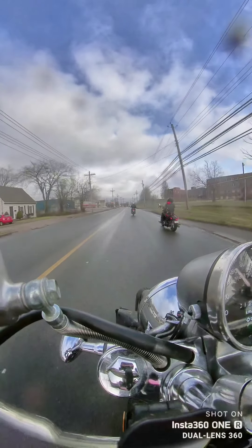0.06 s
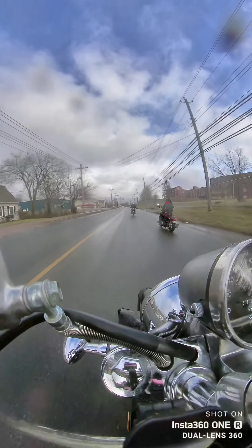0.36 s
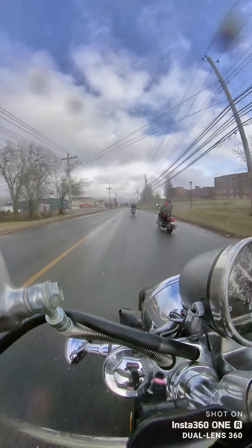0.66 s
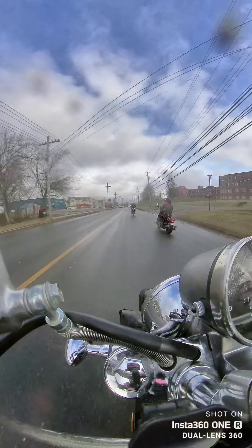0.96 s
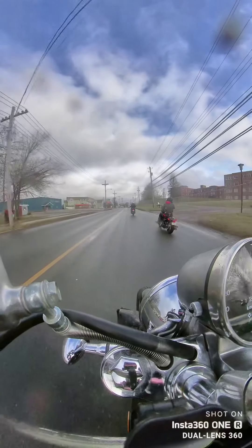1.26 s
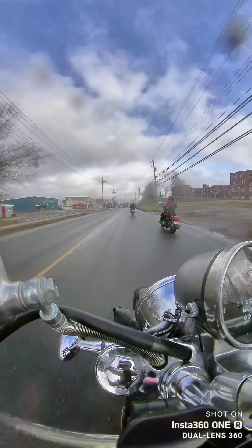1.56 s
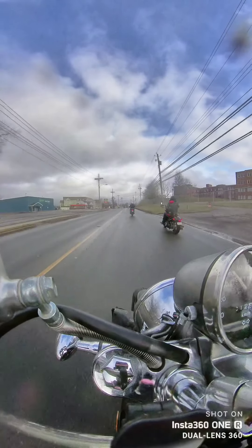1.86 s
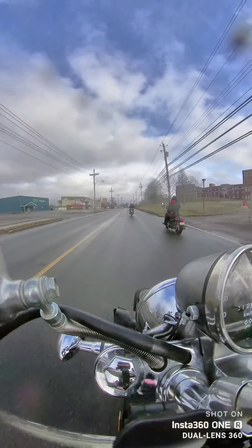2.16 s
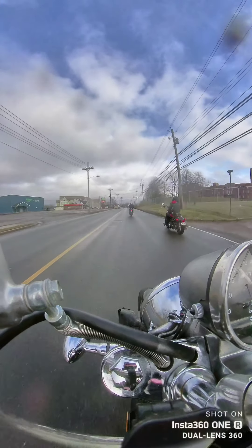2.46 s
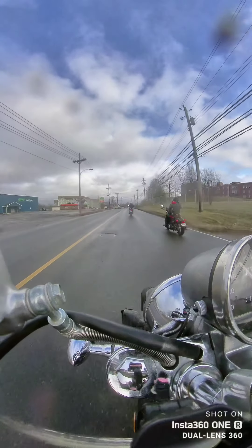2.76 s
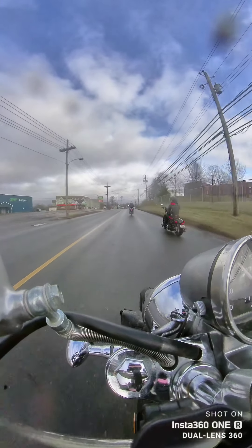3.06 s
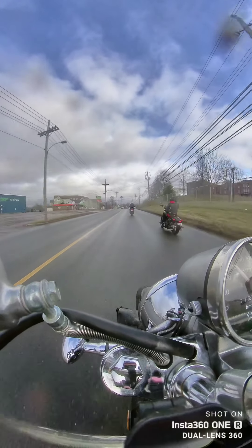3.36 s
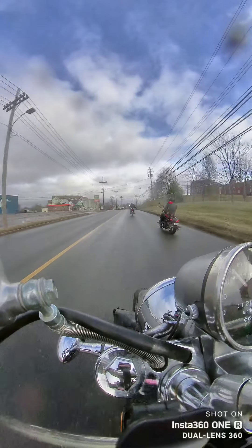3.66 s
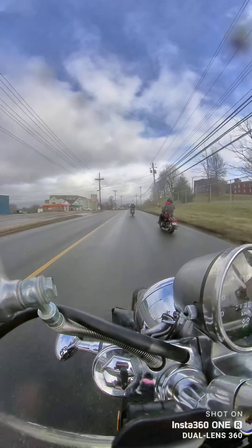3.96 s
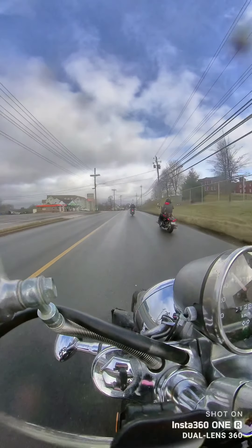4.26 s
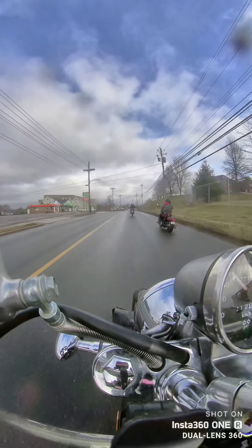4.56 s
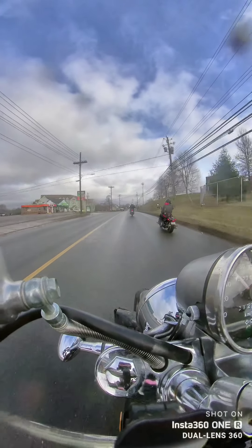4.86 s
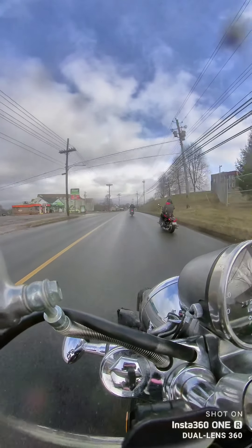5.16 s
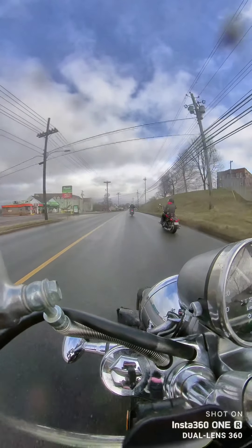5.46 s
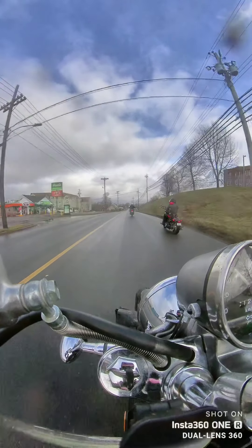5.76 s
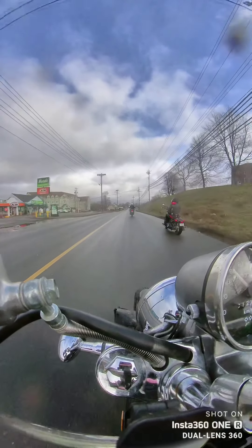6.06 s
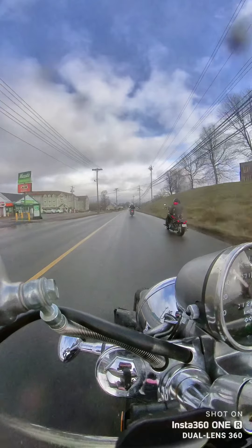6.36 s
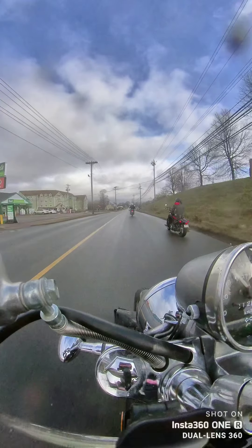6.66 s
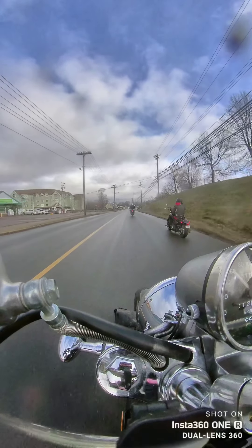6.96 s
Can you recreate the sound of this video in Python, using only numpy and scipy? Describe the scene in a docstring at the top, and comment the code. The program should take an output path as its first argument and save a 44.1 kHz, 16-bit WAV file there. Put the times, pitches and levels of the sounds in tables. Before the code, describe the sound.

Wind gusts over the low, throbbing drone and light rattle of a cruising motorcycle, with faint wet tyre hiss and two water splashes.

```python
"""Cruiser motorcycle on a wet street

Heard at road speed from a stereo microphone on the handlebar. The twin's firing makes the exhaust
boom and drone, its valve gear rattles and loose fittings knock over bumps. Wind buffets both
microphone ports and sets hollow parts ringing. The tyres hiss on the wet road, and water twice
spatters on the left port."""
import sys
import numpy as np
from scipy import signal
from scipy.fft import rfft, irfft, next_fast_len
from scipy.io import wavfile
from scipy.ndimage import uniform_filter1d, minimum_filter1d

SR = 44100
rng = np.random.default_rng(int(sys.argv[2]) if len(sys.argv) > 2 else 0)


def to_wav(s):
    """Save 16-bit WAV."""
    ch = np.atleast_2d(s).T  # columns
    pcm = np.round(np.clip(ch, -1, 1) * 32767)  # PCM
    wavfile.write(sys.argv[1], SR, pcm.astype(np.int16))


N = 309141
TIME = np.arange(N) / SR
FREQS = np.maximum(np.fft.rfftfreq(next_fast_len(N), 1 / SR), 1)


# The exhaust's boom, from the handlebar. Each row: frequency in Hz, left and right level in dB.
BOOM_RESPONSE = [(135, -50, -50), (152, -46, -32), (161, -44, -24.5), (170, -42, -14), (182, -38, -9.8),
                 (195, -38, -9.6), (207, -36, -9.6), (217, -36, -10.8), (224, -36, -15), (233, -38, -19),
                 (243, -35, -25), (268, -37, -32)]
# Its rise and fall along the ride. Each row: time in seconds, gain in dB.
BOOM_GAIN = [(0, 2.5), (1.1, 2), (1.2, -2.5), (1.32, 1.5), (2.2, 3), (2.8, -1), (2.95, 1.5), (3.1, -1.5),
             (3.3, .5), (4.0, 2.5), (4.9, 3), (5.15, 0), (5.9, .5), (6.05, -4.5), (6.15, 0), (6.5, -2),
             (6.7, 0), (7, 0)]

def boom(cycle_hz, cycles, burble_db, waver_db=1.0, dispersion_radians=0.6):
    """Each cycle's firing rings the pipe near 200 Hz: its low harmonics keep in step and throb."""
    out = np.zeros((2, N))
    hz, *ports = np.transpose(BOOM_RESPONSE)
    for k in range(6, 12):
        pipe = from_db([np.interp(k * cycle_hz, hz, db) for db in ports])
        waver = swell(waver_db * drift(0.92))
        phase = 2 * np.pi * k * cycles + dispersion_radians * (k - 8) ** 2 + 0.06 * drift(2.6)
        out += pipe * waver * np.sin(phase)
    return np.sqrt(2) * from_db(in_time(BOOM_GAIN)[0] + burble_db) * out


# The pipe above its boom, from the handlebar. Each row: frequency in Hz, then levels in dB
# for left when coasting, left at full throttle, and right.
DRONE_RESPONSE = [(267, -47, -30, -27), (298, -32, -34, -52), (317, -14.5, -19, -44),
                  (335, -21, -18.5, -41), (354, -18, -23, -29), (356, -19, -23.5, -31),
                  (385, -23, -25, -31.5), (410, -34, -34, -36), (426, -36, -24, -41), (450, -45, -48, -52),
                  (500, -31, -50, -36), (526, -44, -50, -42), (563, -48, -64, -33), (670, -59, -59, -62)]

def drone(cycle_hz, cycles, throttle, waver_db=2.5, left_lag_radians=2.21):
    """Higher firing harmonics slide through the pipe's resonances; the throttle shifts their weight."""
    out = np.zeros((2, N))
    hz, *columns = np.transpose(DRONE_RESPONSE)
    for k in range(12, 29):
        coasting, pulling, right = [np.interp(k * cycle_hz, hz, db) for db in columns]
        pipe = from_db([coasting + throttle * (pulling - coasting), right])
        phase = 2 * np.pi * (k * cycles + rng.random()) + 0.087 * drift(1.4)
        out += pipe * swell(waver_db * drift(0.53)) * np.sin([phase - left_lag_radians, phase])
    return np.sqrt(2) * out


# The muffler, behind the microphone. Each row: resonance in Hz, width in Hz, left and right
# level in dB, phase between the ports in radians.
MUFFLER_MODES = [(275, 52, -18.5, -19.5, 0), (345, 99, -23, -32.5, 1)]

def muffler(beat):
    """Puffs of turbulent gas ring in the muffler, a hollow roar between the harmonics."""
    return sum(at_ports(resonate(white(channels=1) * beat, hz, width_hz), *ports)
               for hz, width_hz, *ports in MUFFLER_MODES)


# Drone and muffler together, along the ride. Each row: time in seconds, gain in dB.
PIPE_GAIN = [(0, 3), (.45, 1.5), (1.1, 2.5), (1.27, 1.5), (1.9, 0), (3.5, 0.5), (3.72, 2.5), (4.12, 0),
             (4.28, -1), (4.7, 1.5), (5.1, 0), (5.6, 1), (6.1, -2.5), (6.28, -1.5), (6.42, 1), (7, -2.5)]

def exhaust(cycle_hz, cycles, throttle, beat, burble_db):
    """The pipe's drone and the muffler's roar swell together above the boom."""
    pipe = drone(cycle_hz, cycles, throttle) + muffler(beat)
    return pipe * from_db(in_time(PIPE_GAIN)[0]) + boom(cycle_hz, cycles, burble_db)


# Wind right on the microphone. Each row: frequency in Hz, left and right level in dB per Hz.
WIND_SPECTRUM = [(40, -72, -58), (106, -79, -76), (134, -64, -57.5), (175, -42, -34), (218, -39.5, -30.5),
                 (254, -41, -35.5), (299, -39.5, -37), (420, -41, -48), (470, -46, -46.5),
                 (653, -54, -47.5), (700, -52.5, -43.5), (823, -50.5, -47.5), (1010, -60.5, -54.5),
                 (1150, -65, -55), (1470, -65.5, -62), (1725, -68, -61.5), (7500, -87.5, -84.5)]
# Buffeting air at the handlebar. Each row: time in seconds, strength in dB.
BUFFET_GAIN = [(0, 4), (1.03, 7), (1.5, 7), (2.35, 6), (2.75, -2), (3.4, -1), (4.05, 9), (4.9, 9),
               (5.25, 2), (6.1, -2), (7, 2)]
# Lulls behind the windshield. Each row: centre in seconds, half-width in seconds, dip in dB.
BUFFET_LULLS = [(1.2, .08, -20), (2.87, 0.044, -10), (3.62, 0.032, -18), (4.48, 0.055, -12),
                (5.15, 0.066, -11), (5.54, 0.044, -15), (5.73, 0.067, -20), (6.0, 0.069, -13),
                (6.2, .06, -1), (6.42, .04, -7), (6.68, 0.029, -21), (6.85, .03, -15)]

def wind(rush_db, rumble_hz=135, split_hz=420, shedding_db=7, flutter_db=1.5):
    """Each port has its own eddies: the largest thud, middling ones roar, small ones flutter."""
    buffet_db = in_time(BUFFET_GAIN)[0] + bells(BUFFET_LULLS)
    lows = 1 / (1 + (FREQS / rumble_hz) ** 8)
    below_split = 1 / (1 + (FREQS / split_hz) ** 4)
    air, spectrum = white(), colour(WIND_SPECTRUM)
    eddies = np.array([shedding() for port in range(2)])
    rumble = shaped(air, spectrum * lows) * from_db(buffet_db) * swell(shedding_db * eddies)
    roar_db = 0.041 * buffet_db - 0.2 * (eddies + drift(20) / 2)
    roar = shaped(air, spectrum * (below_split - lows)) * swell(roar_db)
    flutter = np.array([swell(rush_db + flutter_db * drift(27)) for port in range(2)])
    return rumble + roar + shaped(air, spectrum * (1 - below_split)) * flutter


def shedding(rate_hz=7.5, width_hz=4):
    """Eddies break off the windshield at a loose beat: -1 between them, 1 as one hits."""
    return np.tanh(resonate(white(channels=1), rate_hz, width_hz)[0] + drift(3.4) / 2)


# Hollow parts of the front end, near the microphone. Each row: resonance in Hz, width in Hz,
# left and right level in dB, phase between the ports in radians.
CAVITY_MODES = [(944.5, 50, -25, -67, 1.5), (1265, 74, -40.5, -39.5, -1), (1325, 86, -33, -35.5, 0.4),
                (1745, 140, -36.5, -36.5, 3.5)]
# How strongly they ring. Each row: time in seconds, then a gain in dB for each part, lowest first.
CAVITY_GAINS = [(0, -0.5, 1.8, -0.5, 6.7), (.6, 2.5, 2, 1.5, 5.8), (1.3, 1, 1, -1, 3.7),
                (1.48, 0.5, 1, 4.5, 2.4), (1.8, 3.5, 1, 1, 2.6), (2.2, 1, 0.27, 4.5, 2),
                (3.0, 3.5, 0, .5, 1), (3.75, 0, 0, 0, 1), (4.15, -3, 1.2, -3.5, 3),
                (4.55, -2.5, 2.2, -3.5, 4.3), (4.75, -6, 2, 1.5, 4.3), (5.08, -2, 1, 3.5, 2.2),
                (5.3, 3, 0, 0, 1), (5.75, -1, 0.15, -2.5, 1), (6.4, -2.5, 0, -1.5, 1), (7, -2, 0, -1, 1)]

def cavities(beat, wander_hz=8):
    """Air and engine shake set hollow parts ringing; their pitch wanders a little with the airflow."""
    out = np.zeros((2, N))
    for (hz, width_hz, *ports), blown_db in zip(CAVITY_MODES, in_time(CAVITY_GAINS)):
        ring = resonate(white(channels=1) * beat, hz, width_hz)
        analytic = signal.hilbert(ring, next_fast_len(N))[..., :N]
        pitch_shift = np.exp(2j * np.pi * np.cumsum(wander_hz * drift(4)) / SR)
        out += from_db(blown_db) * at_ports(np.real(analytic * pitch_shift), *ports)
    return out


# Hoots from the front end, mostly on the left. Each row: centre in seconds, half-width in seconds,
# level in dB, pitch in Hz.
GUST_HOOTS = [(0.503, 0.027, -17, 935), (.74, 0.046, -32, 935), (0.887, 0.014, -10, 928),
              (1.761, 0.0044, -13, 912), (3.84, 0.0066, -1.5, 928), (3.88, .005, -15, 930),
              (4.796, 0.046, -22, 635), (5.77, 0.055, -23, 935), (6.017, 0.043, -30, 924),
              (4.38, 0.013, -20, 1237), (6.565, .022, -19, 1215)]

def hoots(wobble_radians=0.25, right_db=-16):
    """A gust briefly blows a hollow part into a wobbling tone."""
    wobble = wobble_radians * drift(40)
    tones = sum(bells([(s, half_width_s, from_db(db))]) * np.sin(2 * np.pi * hz * TIME + wobble)
                for s, half_width_s, db, hz in GUST_HOOTS)
    return tones * stereo(0, right_db)


# Valve gear, below the handlebar. Each row: frequency in Hz, left and right level in dB per Hz.
RATTLE_SPECTRUM = [(402, -84, -61), (830, -63, -67.5), (1150, -66.5, -73), (1630, -60.5, -61.5),
                   (2160, -82, -88.5), (4000, -85, -76), (5930, -79.5, -95), (9000, -144, -112)]
# The engine casing around it. Each row: resonance in Hz, width in Hz, left and right level in dB.
CASING_MODES = [(1920, 71, -50, -41.5), (2565, 110, -66, -64), (3140, 85, -50.5, -63), (4330, 60, -56, -72)]

def rattle(beat):
    """The valve gear makes pulsing mechanical noise, some of it ringing in the casing."""
    out = shaped(white() * beat, colour(RATTLE_SPECTRUM))
    for hz, width_hz, left_db, right_db in CASING_MODES:
        out += stereo(left_db, right_db) * resonate(white() * beat, hz, width_hz)
    return out


def valve_beat(cycles, cycle_depth=0.096, valve_depth=0.22, uneven_db=1.54):
    """The clatter swells once a cycle, with four valve closings inside it."""
    turn = 2 * np.pi * cycles
    pulse = np.exp(cycle_depth * np.cos(turn) + valve_depth * np.cos(4 * turn))
    return rms_one(pulse * from_db(uneven_db * drift(25)))


# Loose fittings on the larger bumps, from the handlebar; the rows at 1.45 and 1.485 s are instead # brief rings
# of a hollow part of the front end near 1.3 kHz. Each row: start in seconds, # left and right level in dB,
# pitch in Hz.
BUMP_KNOCKS = [(.418, -23, -14, 1460), (1.45, -14, -20, 1340), (1.485, -14, -28, 1330),
               (1.764, -17, -14, 1250), (2.956, -18, -20, 1495), (4.267, -23, -20, 1660),
               (4.316, -27, -24, 2200), (4.793, -31, -28, 1990), (4.919, -24, -16, 1370),
               (4.954, -32, -17, 1870), (5.128, -18.5, -27, 2130), (5.62, -32, -24, 2220),
               (5.71, -27, -28, 2250), (6.005, -18, -17, 1480), (6.518, -14.5, -32, 2300),
               (6.544, -14, -34, 2320)]

def knocks(decay_s=0.0067, gain_db=0.5, roughness=0.11):
    """Each knock rings briefly with one damped mode, roughened by the loose contact."""
    out, t = np.zeros((2, N)), TIME[:SR // 20]
    for s, left_db, right_db, hz in BUMP_KNOCKS + faint_knocks():
        phase = 2 * np.pi * hz * t + roughness * np.cumsum(rng.standard_normal(len(t)))
        ring = from_db(gain_db) * np.sin(phase) * np.exp(-t / decay_s)
        add_at(out, s, stereo(left_db, right_db) * ring)
    return out


def faint_knocks(count=9, left_db=-38, right_db=-26, spread_db=3, low_hz=1300, high_hz=1770):
    """Small bumps, scattered at random along the road: rows like those of BUMP_KNOCKS."""
    when, strength, pitch = rng.random((count, 3)).T
    db = spread_db * (2 * strength - 1)
    hz = low_hz * (high_hz / low_hz) ** pitch
    return list(zip(when * (TIME[-1] - 0.1), left_db + db, right_db + db, hz))


# Water landing right on the left port. Each row: time in seconds, level in dB, hold in seconds,
# treble cutoff in Hz, level of the thud in dB.
SPLASHES = [(4.387, -7, 0.018, 7000, -1), (6.518, -21, 0.039, 1800, -30), (6.563, -11.5, 0.026, 6000, -3)]
# Its tone at the port, from thud to fizz. Each row: frequency in Hz, relative level in dB.
SPLASH_SPECTRUM = [(90, -1), (280, 23), (700, 7.5), (1400, 5.5), (2400, -2), (4300, 0.5), (5600, -7.5),
                   (7000, -8), (9000, -33), (15000, -25)]

def spatter(attack_s=0.0085, release_s=0.015, thud_hz=254, thud_s=0.008,
            ring_hz=2500, ring_width_hz=700, ring_db=-4):
    """A splash lands with a thud, holds and dies away as a crackle that sets the left port ringing."""
    crackle, thuds = np.zeros((2, N))
    t = TIME[:SR // 8] - 0.025  # begins early to leave room for the attack
    for s, db, hold_s, cutoff_hz, thud_db in SPLASHES:
        envelope = np.exp(np.minimum(t, 0) / attack_s - np.maximum(t - hold_s, 0) / release_s)
        burst = from_db(db) * envelope * patter(t) * rng.standard_normal(len(t))
        thud = np.exp(-(t / thud_s - 0.5) ** 2) * np.sin(2 * np.pi * thud_hz * t)
        add_at(crackle, s + t[0], signal.lfilter(*signal.butter(1, cutoff_hz, fs=SR), burst))
        add_at(thuds, s + t[0], from_db(thud_db) * thud)
    port_ring = 1 + from_db(ring_db) / (1 + 2j * (FREQS - ring_hz) / ring_width_hz)
    return (shaped(crackle, rms_one(colour(SPLASH_SPECTRUM)) * port_ring) + thuds) * stereo(-4, -32)


def patter(t, count=50, drops_per_s=540, decay_s=0.0031, spread_db=3):
    """The envelope of a splash's small drops, uneven in spacing and size."""
    arrivals = t[0] + (np.arange(count) + rng.random(count)) / drops_per_s
    sizes = from_db(-spread_db * rng.standard_normal(count))
    return rms_one(sum(size * (t >= at) * np.exp(-np.abs(t - at) / decay_s)
                       for at, size in zip(arrivals, sizes)))


# Big drops within the splashes, on the left port. Each row: start in seconds, level in dB,
# pitch in Hz, decay in seconds.
BIG_DROPS = [(4.387, -2, 2300, .0012), (4.3893, -7, 2450, .0016), (4.3933, -2, 2980, .0015),
             (4.3973, -10.5, 2280, 0.0015), (4.3995, -6, 4300, 0.0013), (4.405, -3, 3700, .0008),
             (4.4142, -12, 3000, 0.0021), (6.56, -16, 2470, 0.0013), (6.5692, -3.5, 2270, 0.0028),
             (6.572, -6.5, 2680, 0.0028), (6.579, -3, 2200, 0.0017), (6.582, -11, 2200, 0.00092),
             (6.5882, -10, 3870, 0.00065), (6.589, -20, 7000, .001)]

def big_drops(right_db=-26, crack_db=1.0, crack_s=0.0007, crack_top_hz=4800, roughness=0.1):
    """A big drop lands with a sharp crack and a very short, rough ring."""
    out, t = np.zeros(N), TIME[:SR // 50]
    for s, db, hz, decay_s in BIG_DROPS:
        wobble, burst = rng.standard_normal((2, len(t)))
        ring = np.sin(2 * np.pi * hz * t + roughness * np.cumsum(wobble)) * np.exp(-t / decay_s)
        crack = signal.lfilter(*signal.butter(2, crack_top_hz, fs=SR), burst * np.exp(-t / crack_s))
        add_at(out, s, from_db(db) * (ring + from_db(crack_db) * crack))
    return out * stereo(0, right_db)


# Tyre hiss, up from the road. Each row: frequency in Hz, left and right level in dB per Hz.
SPRAY_SPECTRUM = [(5200, -88, -86), (6800, -80.5, -79.5), (8000, -78, -76), (9000, -79, -74),
                  (10000, -79.5, -68.5), (11600, -73.5, -66), (12500, -72.5, -70), (13500, -72, -72),
                  (15700, -75, -75)]
# Wetness of the street under the wheels. Each row: time in seconds, gain of the spray in dB.
ROAD_WETNESS = [(0, -1.5), (1.2, -1), (2.28, -0.2), (2.35, 2.5), (2.42, 0), (2.65, 0.5), (3.1, -1.5),
                (4.16, -2), (4.21, 3), (4.28, -1.5), (4.9, -1.5), (5.5, 0), (6, -2.4), (6.4, 0), (7, -1.5)]

def tyres(mist_hz=13000, grain_db=1.0, flicker_db=1.45, mist_flicker_db=2.2):
    """Water torn from the tread hisses in fine grains; the finest mist is diffuse."""
    diffuse = 1 / (1 + (mist_hz / FREQS) ** 16)
    spectrum = colour(SPRAY_SPECTRUM)
    grains = white(channels=1) * swell(grain_db * drift(250))
    hiss = shaped(grains, spectrum * np.sqrt(1 - diffuse)) * swell(flicker_db * drift(25))
    mist = shaped(white(), spectrum * np.sqrt(diffuse)) * swell(mist_flicker_db * drift(25))
    return (hiss + mist + sizzle()) * from_db(in_time(ROAD_WETNESS)[0])


def sizzle(low_hz=9500, high_hz=14000, bands=5, ticks_per_s=700, clump_db=3, spread_db=3.5):
    """Single droplets of spray tick in loose clumps, in a few high bands."""
    out = np.zeros(N)
    for hz in np.geomspace(low_hz, high_hz, bands):
        ticks = rng.random(N) < ticks_per_s / bands / SR * swell(clump_db * drift(12))
        sizes = from_db(spread_db * np.minimum(rng.exponential(1, N), 3))
        out += resonate(ticks * sizes, hz, width_hz=1500)
    return rms_one(out) * stereo(-44, -40)


# The drive train, faint at the handlebar. Each row: multiple of the cycle rate, left and right
# level in dB.
WHINE_TONES = [(9.7, -50, -25), (17.75, -31, -37), (35.5, -48, -42), (38, -40, -50), (72, -47, -46)]

def whine(cycles, waver_db=4.5):
    """Teeth of the drive train mesh at multiples of the engine speed."""
    out = np.zeros((2, N))
    for multiple, left_db, right_db in WHINE_TONES:
        tone = np.sin(2 * np.pi * multiple * cycles + drift(4.8))
        out += stereo(left_db, right_db) * rms_one(tone * from_db(waver_db * drift(5.1)))
    return out


# Water over the left port. Each row: centre in seconds, half-width in seconds, dip in dB.
WATER_FILMS = [(4.47, 0.043, -2.5), (6.7, 0.12, -1)]

def water_film():
    """Gain of each port: after a splash a film of water briefly turns the left one down."""
    return from_db([bells(WATER_FILMS), np.zeros(N)])


def from_db(db):
    """Decibels to gain."""
    return 10 ** (np.asarray(db) / 20)


def stereo(left_db, right_db):
    """A gain for each port."""
    return from_db([[left_db], [right_db]])


def at_ports(ring, left_db, right_db, radians):
    """One vibration reaches the two ports at different levels and phases."""
    return shaped(ring, stereo(left_db, right_db) * np.exp([[0], [1j * radians]]))


def rms_one(x):
    """Scale to unit rms."""
    return x / np.sqrt(np.mean(x ** 2) + 1e-20)


def swell(db):
    """A level curve as a gain of unit rms."""
    return rms_one(from_db(db))


def in_time(rows):
    """The columns of a curve at every sample."""
    s, *columns = np.transpose(rows)
    return [np.interp(TIME, s, column) for column in columns]


def bells(rows):
    """A curve made of bell-shaped rises or dips."""
    return sum(height * np.exp(-((TIME - s) / half_width_s) ** 2) for s, half_width_s, height in rows)


def add_at(out, start_s, sound):
    """Mix a short sound into a track."""
    start = round(start_s * SR)
    out[..., start:start + sound.shape[-1]] += sound


def shaped(x, gain):
    """Filter by a gain per frequency."""
    size = next_fast_len(N)
    return irfft(rfft(x, size) * gain, size)[..., :N]


def colour(points):
    """Gain per frequency for each dB column of a spectrum, falling steeply beyond its ends."""
    hz, *columns = np.transpose(points)
    ends = 1 / np.sqrt((1 + (hz[0] / 2 / FREQS) ** 4) * (1 + (FREQS / hz[-1] / 2) ** 8))
    return from_db([np.interp(np.log(FREQS), np.log(hz), db) for db in columns]) * ends


def resonate(x, hz, width_hz):
    """A resonance with steep skirts, at unit rms."""
    detune = (FREQS ** 2 - hz ** 2) / (FREQS * width_hz * np.pi / 2)
    return rms_one(shaped(x, 1 / (1 + 1j * detune) ** 2))


def white(channels=2):
    """Noise of unit power per Hz."""
    return rng.standard_normal((channels, N)) * np.sqrt(SR / 2)


def drift(rate_hz, step=40, settle=2000):
    """A smooth random curve of unit rms, mostly slower than rate_hz."""
    pole = np.exp(-2 * np.pi * rate_hz * step / SR)
    noise = rng.standard_normal(N // step + settle + 2)
    slow = signal.lfilter([1], [1, -2 * pole, pole * pole], noise)[settle:]
    return np.interp(np.arange(N) / step, np.arange(len(slow)), rms_one(slow))


def limit(x, ceiling, hold_s):
    """Turn each channel down just enough around its peaks."""
    span = int(hold_s * SR)
    headroom = np.minimum(1, ceiling / (np.abs(x) + 1e-9))
    return x * uniform_filter1d(minimum_filter1d(headroom, span), span)


# Engine speed along the street. Each row: time in seconds, four-stroke cycles per second.
ENGINE_SPEED = [(0, 24.05), (.45, 24.3), (.65, 24.33), (.8, 24.5), (1.1, 24.4), (1.32, 24.12),
                (1.53, 24.32), (3.0, 23.21), (3.36, 23.0), (3.58, 23.13), (3.77, 22.7), (4.5, 22.81),
                (5.0, 23.16), (5.6, 23.04), (5.9, 22.78), (6.08, 22.38), (6.25, 22.5), (7.0, 21.88)]
# The rider's throttle, open at first and again later. Each row: time in seconds, opening from 0 to 1.
THROTTLE_OPENING = [(0, 0.83), (1.2, 0.6), (1.4, 0.23), (4.05, 0.03), (4.25, 0.8), (4.8, 1), (5.1, 0.3)]

def scene(cruise_hz=23.5):
    """The ride from the handlebar: speed and throttle drive the engine, amid wind and spray."""
    cycle_hz, = in_time(ENGINE_SPEED)
    throttle, = in_time(THROTTLE_OPENING)
    cycles = np.cumsum(cycle_hz) / SR
    rush_db = 0.1 * drift(0.47) - 0.07 * (cycle_hz - cruise_hz) + 1.5 * throttle  # upper wind, rattle
    burble_db = 1.5 * drift(rate_hz=9)
    beat = valve_beat(cycles)
    engine = exhaust(cycle_hz, cycles, throttle, beat, burble_db) + whine(cycles)
    clatter = rattle(beat) * from_db(0.5 * rush_db) + knocks()
    water = tyres() + spatter() + big_drops()
    air = wind(rush_db) + cavities(beat) + hoots()
    return water_film() * (engine + clatter + air) + water


def record(dry, crossover_hz=520, cutoff_hz=15750):
    """One limiter holds down the boom, a faster one catches the remaining peaks; the top is cut."""
    bass = shaped(dry, 1 / (1 + (FREQS / crossover_hz) ** 8))
    held = limit(bass, ceiling=0.88, hold_s=0.006) + dry - bass
    limited = limit(held, ceiling=0.98, hold_s=0.001)
    return shaped(limited, np.clip((cutoff_hz - FREQS) / 100, 0, 1))


dry = scene()
out = record(dry)
to_wav(out)
```